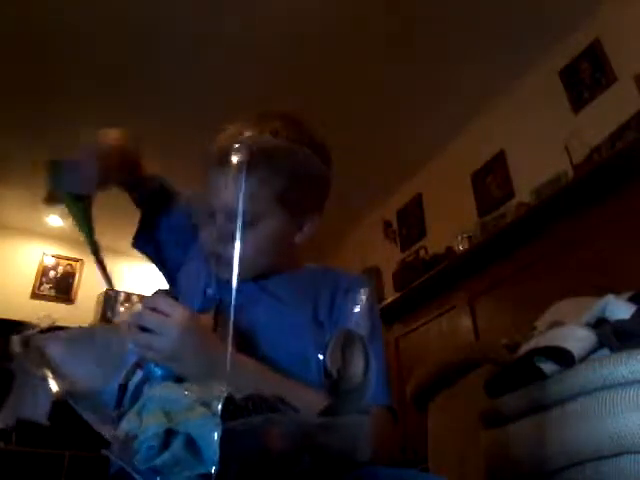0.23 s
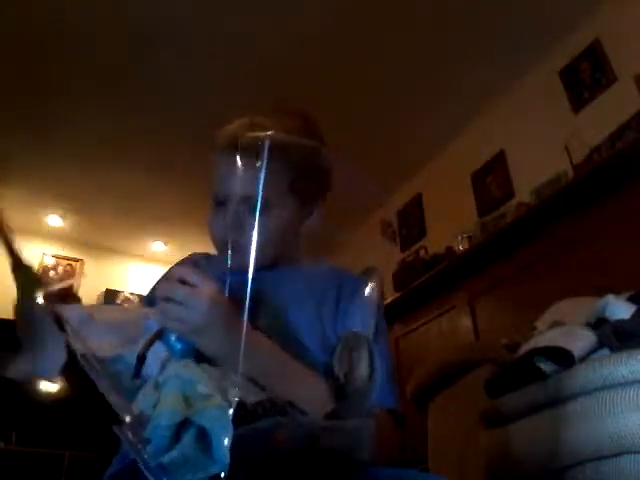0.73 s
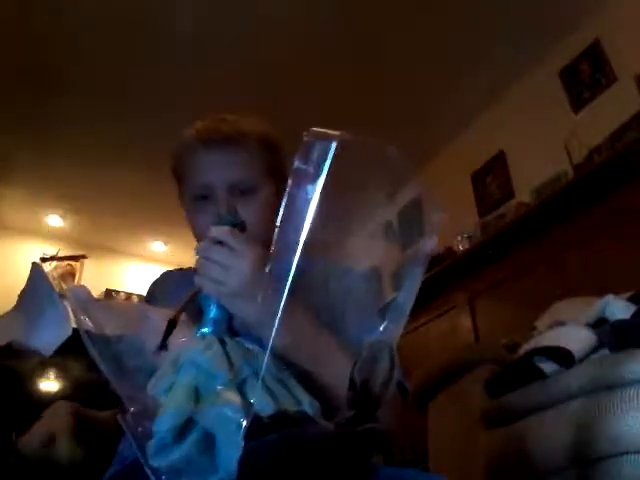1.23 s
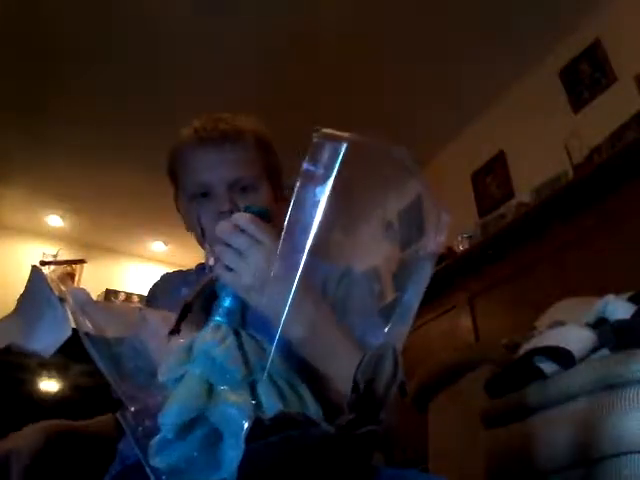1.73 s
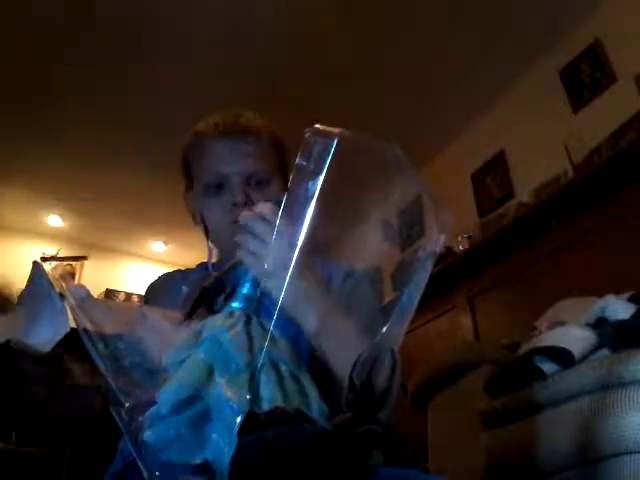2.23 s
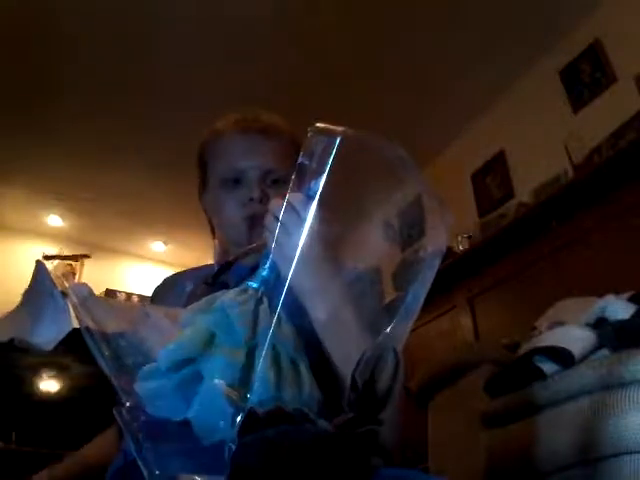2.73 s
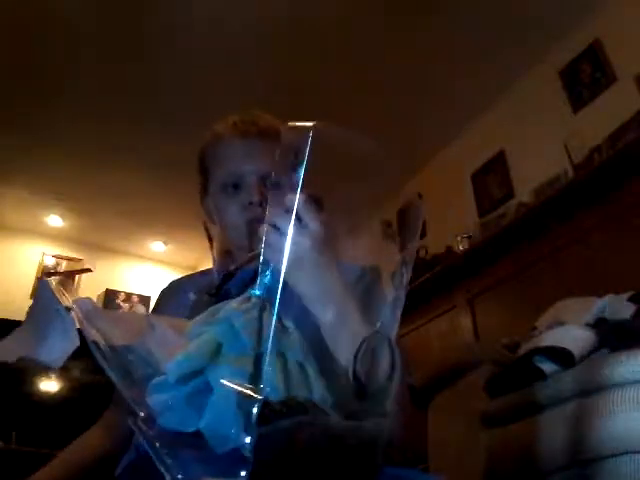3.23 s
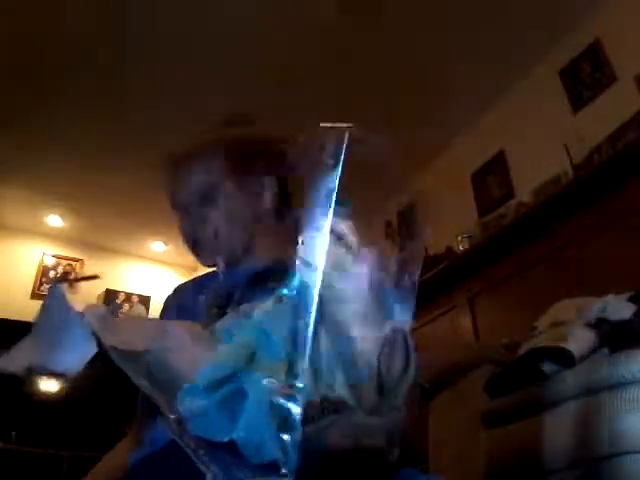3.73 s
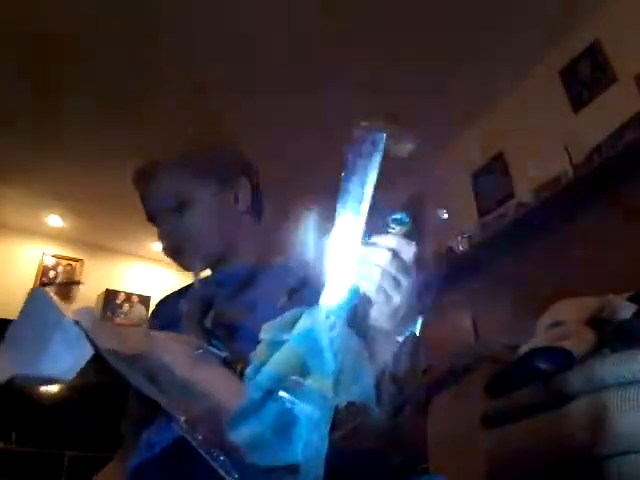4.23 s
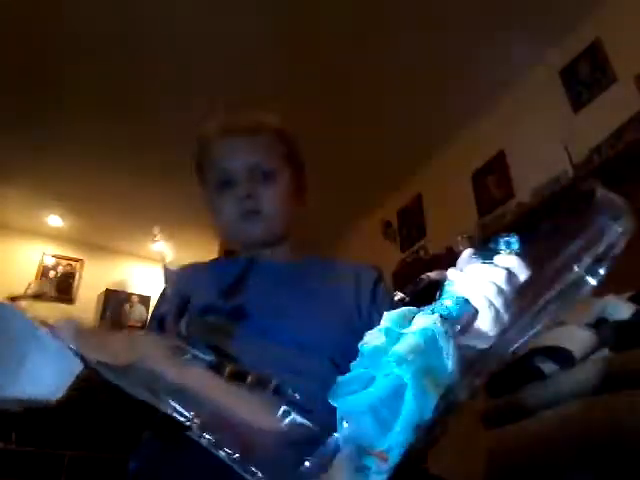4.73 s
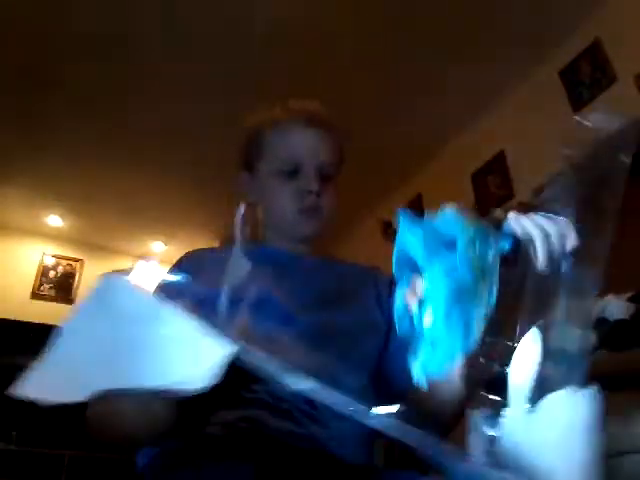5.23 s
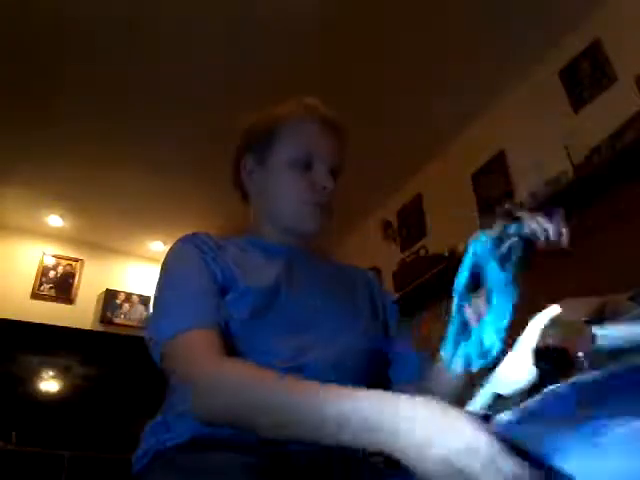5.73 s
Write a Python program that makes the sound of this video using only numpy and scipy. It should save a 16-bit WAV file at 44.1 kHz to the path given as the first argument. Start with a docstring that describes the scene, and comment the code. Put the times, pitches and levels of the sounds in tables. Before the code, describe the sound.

A stiff clear plastic package is cut and pulled open by hand in a furnished room, heard through a small close microphone with muffled highs, a short room tail and faint low hum and hiss. At 0.1 s a sharp scissor-like snap lands with a brief low boom. Until 1.9 s there is near quiet: small ticks at 0.3 and 0.7, light scrapes and crinkles around 0.9 and 1.3. From 1.9 to 2.4 s hollow pops and crackles come in quick succession over low handling thumps, thinning to single clicks by 2.8. Sparse faint ticks and rubs follow until 3.8 s. From 4.2 the plastic buckles, with the loudest cracks and booms at 4.3 to 4.5, then scattered snaps and scrapes to 5.2. A crisp tick at 5.4 leads into a fast, bright seam rip at about 5.5, then hollow creaks, pops and crinkling fade toward 6 s.

```python
"""A sharp snap with a low boom comes first, over faint hiss; more snaps, ticks and rustles follow. A stiff
clear plastic shell is cut, bent and pulled apart by hand in a furnished living room. Snaps are short noise
bursts with brief rings; booms and pops are low decaying tones. Fingers, scraping and a peeling seam are made of
shaped noise and tiny random slips. The room answers with fading noise, and a small close microphone with a port
resonance colours it all."""
import sys
import numpy as np
from scipy import signal
from scipy.fft import rfft, irfft, next_fast_len
from scipy.io import wavfile
from scipy.ndimage import map_coordinates

SR = 44100
rng = np.random.default_rng(int(sys.argv[2]) if len(sys.argv) > 2 else 0)


def dump_mix(stems):
    """Bounce the given channels to the path in sys.argv[1] as a 16-bit WAV at rate SR."""
    frames = np.atleast_2d(stems).T  # one column per channel
    limited = np.clip(frames, -1, 1)  # hard clip at full scale
    pcm = np.round(limited * 32767).astype(np.int16)
    wavfile.write(sys.argv[1], SR, pcm)


N = 264159

# the four bands of a plastic sound, in order middle, hollow, bright, airy: low_hz, high_hz [Hz]
BANDS = [(1500, 4500), (500, 1500), (4500, 8000), (8000, 17000)]
HOLLOW_TOP_HZ = BANDS[1][1]


def amp(db):
    """Turn dB into a gain."""
    return 10 ** (np.asarray(db) / 20)


def unit(x):
    """Scale x to an rms of 1."""
    return x / np.sqrt(np.mean(x ** 2) + 1e-20)


def along(points, hz):
    """Read a curve of (Hz, value) points on a logarithmic frequency axis."""
    point_hz, value = np.transpose(points)
    return np.interp(np.log(hz + 1), np.log(point_hz + 1), value)


def filtered(x, response):
    """Filter x by multiplying its spectrum with a response of frequency."""
    size = next_fast_len(N + SR // 2)
    spectrum = rfft(x, size) * response(np.fft.rfftfreq(size, 1 / SR))
    return irfft(spectrum, size)[..., :N]


def causal(points):
    """Make a minimum-phase filter, which rings only after a sound, from (Hz, dB) points."""
    def response(hz):
        cepstrum = irfft(along(points, hz) * np.log(10) / 20)
        half = len(cepstrum) // 2
        # folding the second half onto the first removes any ringing ahead of the sound
        cepstrum[1:half] *= 2
        cepstrum[half + 1:] = 0
        return np.exp(rfft(cepstrum))
    return response


def band(x, low_hz, high_hz):
    """Keep one frequency band, with gentle slopes."""
    sos = signal.butter(2, [low_hz, high_hz], "band", fs=SR, output="sos")
    return signal.sosfilt(sos, x)


def shell(hz):
    """The hollow plastic shell answers with broad resonances, added with alternating sign."""
    # resonances of the shell: centre_hz [Hz], width_hz [Hz], level_db [dB]
    resonances = [(196, 100, 1), (473, 160, 4), (793, 380, -1), (1203, 83, -0.5), (1439, 47, -7.5),
                  (1875, 53, 4), (2614, 920, -7.5), (3700, 120, -15)]
    total = 0
    for k, (centre_hz, width_hz, level_db) in enumerate(resonances):
        damping = 1j * hz * width_hz
        total = total + (-1) ** k * amp(level_db) * damping / (centre_hz ** 2 - hz ** 2 + damping)
    return total


def through_plastic(drives):
    """Four white drives are each kept to their band at unit gain; the low two ring the shell."""
    mid, hollow, bright, airy = (band(x[:N], low_hz, high_hz) * np.sqrt(SR / 2 / (high_hz - low_hz))
                                 for x, (low_hz, high_hz) in zip(drives, BANDS))
    low = mid - hollow  # neighbouring bands meet in opposite phase
    return .55 * low + .6 * filtered(low, shell) - bright + airy


def grit(slips_per_s, spread_db, clump_db, smooth):
    """Tiny random slips are mixed with a smooth share of noise and swell in clumps; rms 1."""
    hit = rng.random(N) < slips_per_s / SR
    size_db = np.minimum(spread_db * rng.exponential(1, N), 9)
    slips = hit * amp(size_db) * np.sign(rng.standard_normal(N))
    bed = rng.standard_normal(N)
    # a smooth random curve with one new point every 400 samples
    clumps = map_coordinates(rng.standard_normal(N // 400 + 4), [np.arange(N) / 400])
    return unit((unit(slips) + smooth * bed) * amp(clump_db * clumps))


def room_tone():
    """Room tone and circuit hiss are steady noise shaped in frequency."""
    # spectrum of the background: pitch_hz [Hz], relative level_db [dB per Hz]
    hush_curve = [(25, -34), (65, -8.5), (95, -14.5), (120, -8.5), (145, -27), (190, -14), (320, -17.5),
                  (600, -26), (1000, -27), (3000, -32), (6400, -38.5), (9000, -39.5), (15200, -35.5),
                  (16200, -56)]
    level_db = -69
    noise = rng.standard_normal(N)
    return amp(level_db) * unit(filtered(noise, lambda hz: amp(along(hush_curve, hz))))


def room(x):
    """Each frequency of the room's answer dies at its own speed, in fading noise."""
    # how fast the room fades: pitch_hz [Hz], time to fall by 60 dB t60_s [s]
    decay = [(100, 0.61), (300, 0.22), (1800, 0.26), (5000, 0.29), (8500, 0.27), (13000, 0.28)]
    out, step = np.zeros(N + 2 * SR), SR // 4
    for start in range(0, N, step):
        # a fresh noise tail for every quarter second of sound
        hz, t, spectrum = signal.stft(rng.standard_normal(SR // 2), SR, nperseg=256)
        fade = amp(-60 * t / along(decay, hz)[:, None])
        tail = signal.istft(spectrum * fade, SR, nperseg=256)[1]
        wet = signal.fftconvolve(x[start:start + step], tail / np.linalg.norm(tail))
        out[start + 150:][:len(wet)] += wet  # the answer starts 150 samples late
    return out[:N]


def handling():
    """Moving fingers and creases send low rumble and creak through the shell, with fine crinkle above."""
    # hand movement: time_s [s], levels of the shell rumble_db, creak_db and crinkle_db [dB]
    hands = [(0.0, -83, -82, -89.5), (0.6, -73, -73, -66.5), (0.9, -62.5, -66, -56),
             (1.03, -81, -75.5, -65), (1.32, -66, -60.5, -56), (1.52, -73, -78, -96.5),
             (1.95, -81.5, -86, -88.5), (2.075, -58, -58, -55), (2.095, -39.5, -41, -49.5),
             (2.27, -45.5, -70, -60), (2.35, -49, -56, -54.5), (2.48, -50, -58, -56.5),
             (2.62, -72, -71, -76), (2.87, -67, -65, -59), (3.25, -62, -70, -62.5),
             (3.72, -72.5, -68, -64.5), (3.79, -51.5, -57, -54.5), (4.0, -66.5, -64, -56),
             (4.19, -50, -53, -50.5), (4.32, -43, -43.5, -40.5), (4.49, -46, -46, -47),
             (4.67, -50.5, -57, -53), (4.83, -61, -59, -47), (5.17, -54, -58, -52.5),
             (5.31, -57.5, -59, -61), (5.44, -55.5, -57, -66), (5.55, -41.5, -33, -45),
             (5.65, -38, -49, -39), (5.79, -47, -45.5, -41.5), (5.99, -60.5, -52, -48)]
    # spectrum of the crinkle: pitch_hz [Hz], relative level_db [dB per Hz]
    crinkle_curve = [(300, -27), (1200, -32), (2500, -0.5), (4000, 4.5), (6400, 7), (10000, 6.5),
                     (16000, 2.5)]
    time_s, *columns = np.transpose(hands)
    rumble_db, creak_db, crinkle_db = (np.interp(np.arange(N) / SR, time_s, c) for c in columns)
    rumble = band(filtered(grit(150, 14.0, clump_db=2.5, smooth=0.56), shell), 53, 460)
    creak_grit = grit(300, 4, clump_db=3, smooth=0.73)
    creak = band(filtered(creak_grit, lambda hz: shell(hz) + 0.26), 600, 2900)
    crinkle = filtered(grit(2000, 3, clump_db=2.0, smooth=1.7), causal(crinkle_curve))
    return amp(rumble_db) * unit(rumble) + amp(creak_db) * unit(creak) + amp(crinkle_db) * unit(crinkle)


def scrapes():
    """Fingers, blade and seams drag: a soft rub mixed with separate slips rings the panel it touches."""
    # strokes over the plastic: start_s, end_s, edge_s [s], panel ring pitch_hz [Hz], level_db [dB],
    # hollow_db and bright_db: those parts over the level [dB]
    strokes = [(0.782, 0.812, 0.0017, 2680, -55, -20, 16.5), (0.97, 1.036, 0.036, 1280, -61, 8, 7.5),
               (0.718, 0.738, 0.0048, 2030, -59, 7.5, -12), (1.243, 1.273, 0.0067, 2780, -52, -29, 2),
               (1.308, 1.337, 0.014, 3300, -43.5, -17, 3.5), (1.293, 1.397, 0.056, 3040, -53.5, -2, 15),
               (2.524, 2.588, 0.0034, 2760, -61, -3, 14.5), (2.8, 2.893, 0.069, 2020, -50, -3, -2.5),
               (3.096, 3.137, 0.021, 810, -69.5, 18.5, -11), (3.161, 3.274, 0.032, 754, -67, 16.5, -23),
               (3.552, 3.608, 0.039, 2550, -56, 3.5, 1), (3.923, 3.953, 0.017, 2260, -54, -9, 3),
               (4.301, 4.328, 0.045, 2860, -34, -8, 1.5), (4.557, 4.709, 0.053, 3470, -49.5, 5.5, 6),
               (4.866, 4.932, 0.0056, 3250, -52.5, 1, 8), (5.063, 5.253, 0.039, 1970, -47.5, -0.5, 4.5),
               (5.355, 5.401, 0.0078, 4230, -45, -10, 8), (5.476, 5.532, 0.0012, 4000, -35, -13, 15.5),
               (5.977, 5.988, 0.0066, 3240, -46, 9.5, 18.5)]
    # drive behind the middle, hollow, bright and airy part [dB]
    drive_db = [3, 0, -4, 0]
    slip_share = 0.3  # stick-slip share of the drive's power, 0-1
    panel_db, panel_q = -3, 11.4  # panel ring over its part, sharpness of the ring
    t = np.arange(N) / SR
    parts, rings = np.zeros((len(BANDS), N)), np.zeros(N)
    rub = grit(2000, 2, clump_db=1.5, smooth=2)
    slips = grit(450, 4, clump_db=1, smooth=.15)
    for start_s, end_s, edge_s, pitch_hz, level_db, hollow_db, bright_db in strokes:
        a, b = round((start_s - edge_s) * SR), round((end_s + edge_s) * SR)
        inside_s = np.minimum(t[a:b] - start_s, end_s - t[a:b])
        stroke = np.clip(inside_s / (2 * edge_s) + .5, 0, 1) ** 2
        drive = np.sqrt(slip_share) * slips[a:b] + np.sqrt(1 - slip_share) * rub[a:b]
        # the airy part follows the bright one
        gains = amp(level_db + np.array([0, hollow_db, bright_db, bright_db]) + drive_db)
        parts[:, a:b] += gains[:, None] * stroke * drive
        ring = unit(signal.lfilter(*signal.iirpeak(pitch_hz, panel_q, SR), drive))
        ring_db = level_db + panel_db + hollow_db * (pitch_hz < HOLLOW_TOP_HZ)
        rings[a:b] += amp(ring_db) * stroke * ring
    return through_plastic(parts) + rings


def peel():
    """A glued seam close to the microphone lets go in ticks: millisecond-long puffs, mostly treble."""
    # seam ticks: time_s [s], level_db [dB], airy_db: airy part over the level [dB]
    ticks = [(5.3795, -11.5, 10), (5.4631, -25.5, 2), (5.4711, -22, 5), (5.48, -22.5, 5), (5.489, -27, 1),
             (5.496, -20, 6), (5.4995, -8, 8), (5.5055, -14, 7), (5.5114, -11, 12.5), (5.5157, -17, 3),
             (5.518, -12, 7), (5.5262, -15, 9), (5.5325, -14, 8), (5.639, -29, 20), (5.7265, -31, 6),
             (5.7875, -34.5, 12), (5.869, -36, 12)]
    # middle, hollow and bright part of a tick over its level [dB]
    tick_parts_db = [-10.5, -43, 2.5]
    parts, puff = np.zeros((len(BANDS), N)), np.hanning(44)
    for time_s, level_db, airy_db in ticks:
        tick = amp(level_db) * puff * unit(rng.standard_normal(len(puff)))
        i = round(time_s * SR)
        parts[:, i:i + len(puff)] += amp([*tick_parts_db, airy_db])[:, None] * tick
    return through_plastic(parts)


def flexes():
    """A panel pops over, or a low boom sounds, in a few low cycles that die fast; the room gets a broad low
    push."""
    # low pops of the shell and the low boom just after the first snap (row at 0.123 s): time_s [s], level_db
    # [dB], pitch_hz [Hz]
    pops = [(0.112, -20, 308), (0.123, -18, 184), (0.297, -39, 298), (0.494, -48.5, 240), (0.708, -51, 395),
            (0.843, -45.5, 213), (1.133, -51, 280), (1.322, -38.5, 357), (1.399, -42, 253),
            (1.908, -24, 432), (1.97, -25, 444), (2.008, -29.5, 434), (2.094, -28, 433),
            (2.144, -16.5, 178), (2.196, -22, 169), (2.22, -31, 150), (2.296, -20, 183), (2.353, -23, 168),
            (2.518, -36.5, 150), (2.591, -42.5, 302), (2.713, -42, 455), (2.781, -30.5, 353),
            (2.802, -25, 216), (2.818, -29, 195), (3.255, -43.5, 295), (3.337, -41, 290),
            (3.388, -41.5, 353), (3.767, -35.5, 162), (3.785, -37, 189), (3.807, -34.5, 124),
            (4.107, -31.5, 135), (4.229, -29.5, 358), (4.252, -32, 362), (4.275, -20.5, 250),
            (4.345, -16.5, 202), (4.376, -14, 221), (4.389, -19.5, 220), (4.441, -21, 429),
            (4.465, -22, 417), (4.489, -21, 205), (4.5, -24.5, 169), (4.821, -33.5, 256), (4.864, -35, 375),
            (5.027, -35.5, 328), (5.551, -38, 334), (5.585, -26, 180), (5.616, -24, 194),
            (5.66, -25.5, 459), (5.703, -32, 312)]
    # how fast a pop fades: pitch_hz [Hz], time to fall by 60 dB t60_s [s]
    fade_times = [(150, 0.055), (250, 0.035), (450, 0.093)]
    lag_s, attack_s = .003, 0.0011  # fixed delay added to every pop time, rise time constant
    overtone = 0.45  # strength beside the main tone
    out, push, t = np.zeros(N + SR), np.zeros(N), np.arange(SR // 4) / SR
    for time_s, level_db, pitch_hz in pops:
        overtone_hz = rng.uniform(1.6, 2.4) * pitch_hz
        ring = np.sin(2 * np.pi * pitch_hz * t) + overtone * np.sin(2 * np.pi * overtone_hz * t)
        fade = amp(level_db - 60 * t / along(fade_times, pitch_hz))
        pop = fade * (1 - np.exp(-t / attack_s)) ** 2 * ring
        i = round((time_s + lag_s) * SR)
        out[i:][:len(pop)] += pop
        push[i] = np.linalg.norm(pop)  # one click with the pop's energy
    return out[:N], band(push, 110, 580)


def snaps():
    """Each crease lets go in a noise burst and rings briefly; returns the near sound and the room's share."""
    # buckling creases and the snip: time_s [s], level_db [dB], crease ring pitch_hz [Hz],
    # hollow_db and bright_db: those parts over the level [dB], burst's time to fall by 60 dB t60_s [s]
    creases = [(0.1165, -11, 1920, -24, -13, 0.018), (0.2988, -48, 1200, -3.5, -14, 0.0088),
               (0.528, -52.5, 4510, -16, -8, 0.013), (0.7139, -32.5, 1200, -6, -33, 0.013),
               (0.928, -41.5, 2930, -25, 0, 0.0085), (1.256, -40, 2610, -26, -11, 0.01),
               (1.4358, -56, 2730, -13, 5.5, 0.018), (1.907, -16.5, 2360, -2, -13, 0.011),
               (1.9738, -35.5, 1330, -1.5, -14, 0.021), (2.0074, -39, 1030, -4, -18, 0.019),
               (2.0859, -29.5, 1840, -7, -18.5, 0.015), (2.113, -25.5, 1600, -14, -21, 0.012),
               (2.147, -41, 1000, -4, -15, 0.012), (2.1785, -29.5, 1480, -6, -16.5, 0.016),
               (2.1966, -22.5, 1880, -18, -19, 0.0049), (2.2198, -37, 1340, 3, -24, 0.019),
               (2.2376, -40, 1370, 3.5, -28, 0.021), (2.278, -31.5, 1860, -2.5, -17, 0.0091),
               (2.2971, -37.5, 1350, 4, -14, 0.031), (2.3536, -42.5, 1310, 11, -15, 0.025),
               (2.388, -44.5, 985, 5.5, -19, 0.025), (2.5192, -39, 3120, -19, -1, 0.011),
               (2.575, -35, 5040, -13, 1.5, 0.008), (2.5944, -48, 1860, -5, -24, 0.026),
               (2.7131, -47, 1020, -12, -18, 0.029), (2.7811, -33, 1790, 2.5, -12.5, 0.016),
               (3.3391, -37, 1890, 2, -24, 0.0048), (3.3886, -46, 1860, -6, -10, 0.0068),
               (3.42, -54, 1850, 0, -8, 0.0068), (3.7663, -38.5, 1750, 4.5, -19, 0.012),
               (3.7858, -48, 1170, -1, -11, 0.016), (3.8822, -42.5, 1020, -6.5, -6, 0.016),
               (4.1072, -42, 3340, -10, -15, 0.021), (4.121, -39, 1770, -7, -20, 0.016),
               (4.1978, -47, 1060, -1.5, -24, 0.036), (4.2316, -30.5, 1870, -22, -29, 0.02),
               (4.2805, -38, 1070, -5, -22, 0.036), (4.344, -5.5, 2840, -8, -11, 0.0079),
               (4.3823, -9, 1100, -13, -7, 0.016), (4.4006, -19, 1480, -28, 8, 0.007),
               (4.441, -12.5, 1260, -10.5, -12, 0.011), (4.4483, -10, 1110, -15.5, -13, 0.017),
               (4.4658, -36, 1380, 12, -12, 0.013), (4.4913, -11.5, 4700, -13, -12, 0.004),
               (4.595, -22.5, 1110, -14.5, -17, 0.015), (4.6372, -32.5, 2870, -11.5, -8.5, 0.019),
               (4.7115, -32, 4300, -23, -11.5, 0.013), (4.776, -44, 4880, -8, 2.5, 0.012),
               (4.8662, -36, 4350, -12, -17, 0.014), (4.8774, -34, 3350, -19, -3, 0.013),
               (4.9705, -34, 2770, -31, -3, 0.0087), (5.0015, -51, 4550, -11, 15, 0.0091),
               (5.0309, -28, 990, -15, -9.5, 0.02), (5.0573, -28, 1150, -12, -13, 0.013),
               (5.202, -36, 1750, -32, -1, 0.019), (5.352, -44, 5200, -12, 4, 0.011),
               (5.3995, -45, 5000, -11, 0, 0.014), (5.5658, -34.5, 1160, -2.5, 3, 0.033),
               (5.5798, -34, 1520, 5.5, -7, 0.036), (5.6002, -26.5, 1510, 0.5, -6.5, 0.03),
               (5.6173, -32.5, 1250, 3, -24, 0.036), (5.6384, -45, 1040, 0, 3, 0.0053),
               (5.657, -25.5, 1502, 6.5, -4.5, 0.024), (5.7023, -33, 1066, 5.5, -6, 0.012),
               (5.7237, -46, 1050, -12, 9, 0.008), (5.738, -38, 990, 4, 7, 0.016),
               (5.749, -48, 980, 14.5, -6, 0.021), (5.7847, -43, 966, 14, -12, 0.015),
               (5.7989, -40.5, 1010, -17, 6, 0.0091), (5.811, -41.5, 1060, -2, 2.5, 0.026)]
    # burst size behind the middle, hollow, bright and airy part [dB]
    drive_db = [6.2, 12.75, 11.6, 10]
    attack_s = 0.00084  # rise time constant at a level of 0 dB
    soft_slower, soft_wetter = 0.033, 0.065  # per dB below 0: longer rise (share), more room (dB)
    room_db = -6  # share sent to the room at a level of 0 dB
    ring_db, ring_cycles = -10, 41  # crease ring over its part, cycles to fall by 60 dB
    t = np.arange(SR // 10) / SR
    near, far = np.zeros((2, len(BANDS), N + len(t)))
    rings = np.zeros(N + len(t))
    for time_s, level_db, pitch_hz, hollow_db, bright_db, t60_s in creases:
        rise = 1 - np.exp(-t / (attack_s * (1 - soft_slower * level_db)))
        envelope = amp(-60 * t / t60_s) * rise
        size = np.linalg.norm(envelope)
        # the airy part follows the bright one
        gains = amp(level_db + np.array([0, hollow_db, bright_db, bright_db]) + drive_db)
        burst = np.tile(envelope * rng.standard_normal(len(t)), (len(BANDS), 1))
        # one click in the middle and hollow parts keeps the burst's strength steadier
        burst[:2] *= .8
        burst[:2, 20] += .45 * size
        i = round(time_s * SR)
        near[:, i:i + len(t)] += gains[:, None] * burst
        # the room gets one click, sized by the energy of the envelope
        far[:, i] += gains * amp(room_db - soft_wetter * level_db) * size
        part = gains[1] if pitch_hz < HOLLOW_TOP_HZ else gains[0]
        ring_fade = amp(ring_db - 60 * t * pitch_hz / ring_cycles)
        rings[i:i + len(t)] += part * ring_fade * np.sin(2 * np.pi * pitch_hz * t)
    return through_plastic(near) + rings[:N], through_plastic(far)


def scene():
    """Add the near sounds and the room's answer to them."""
    rustle = handling()
    strokes = scrapes() + peel()
    booms, pushes = flexes()
    near, far = snaps()
    to_room = far + amp(14.5) * pushes + amp(-8.5) * strokes + amp(-6.5) * rustle
    return (near + booms + strokes + rustle + room(to_room))[None]


def record(dry):
    """The microphone's port resonance colours the scene; hush lies under it, cut at the band limit."""
    # tone of the microphone and its port: pitch_hz [Hz], gain_db [dB]
    port_curve = [(30, -16.5), (120, -0.5), (300, 0), (4500, -6), (5600, -6.5), (6450, 0.5), (7100, -9),
                  (7700, -17), (8500, -21), (10000, -26.5), (15600, -18), (16200, -43)]
    top_hz = 17150  # nothing passes from here up
    heard = filtered(dry, causal(port_curve)) + room_tone()
    return filtered(heard, lambda hz: hz < top_hz)


dry = scene()
out = record(dry)
dump_mix(out)
```